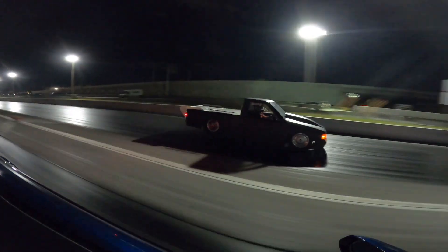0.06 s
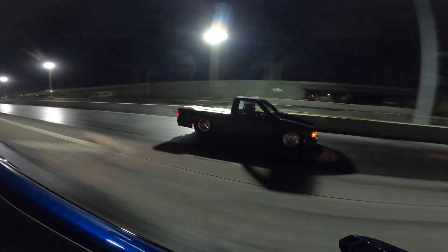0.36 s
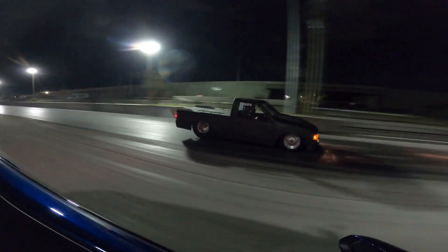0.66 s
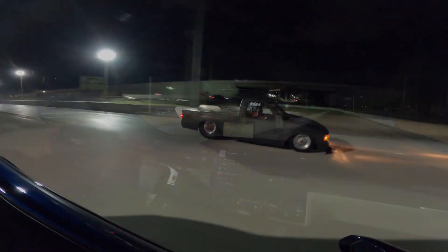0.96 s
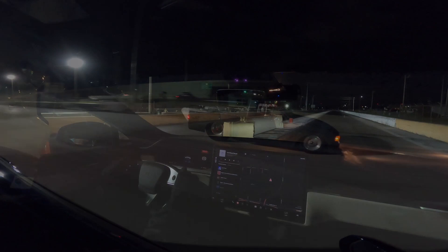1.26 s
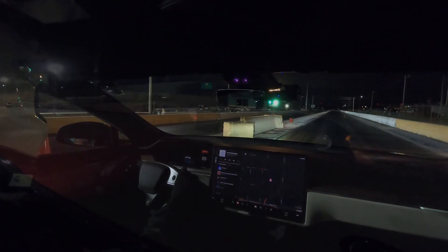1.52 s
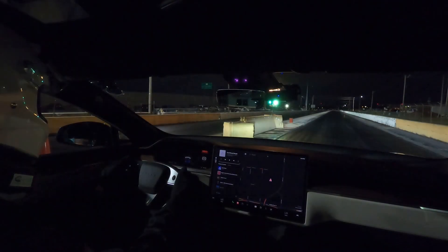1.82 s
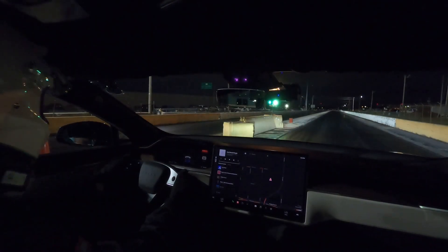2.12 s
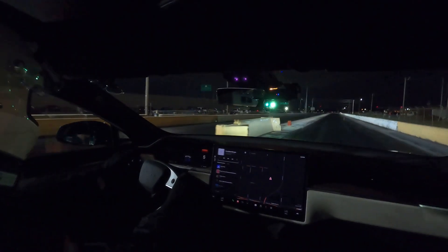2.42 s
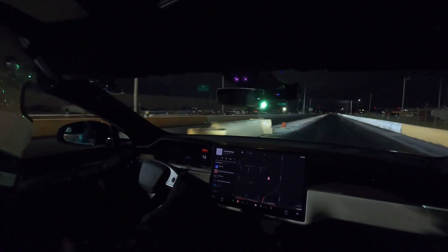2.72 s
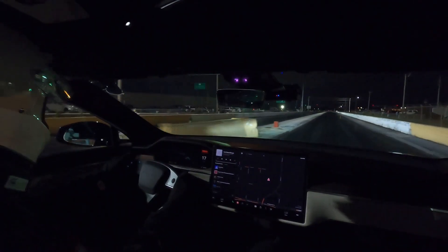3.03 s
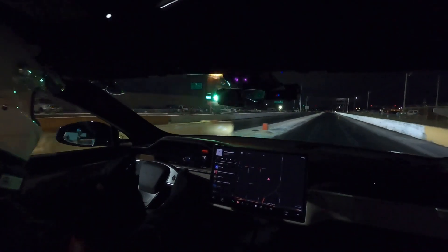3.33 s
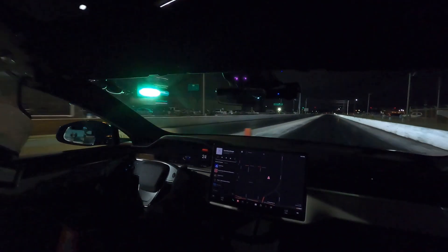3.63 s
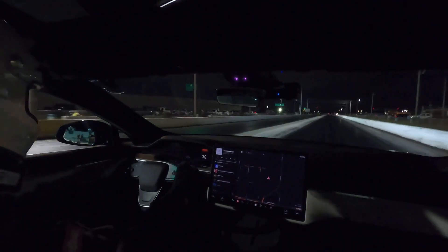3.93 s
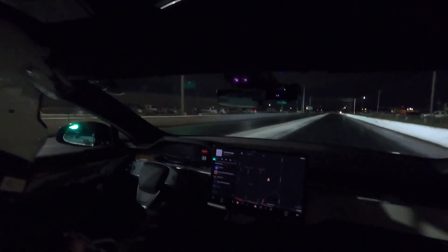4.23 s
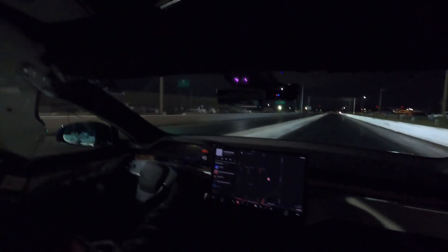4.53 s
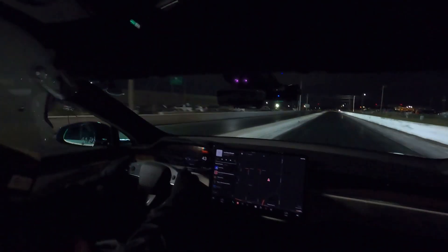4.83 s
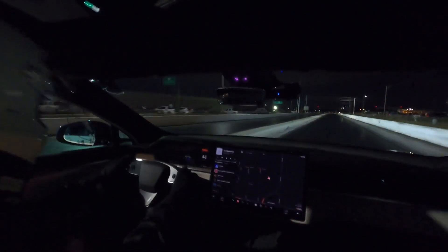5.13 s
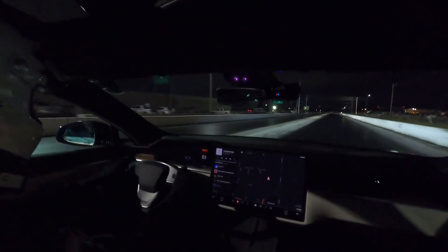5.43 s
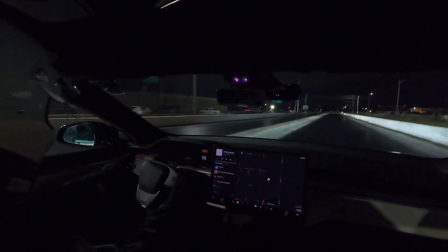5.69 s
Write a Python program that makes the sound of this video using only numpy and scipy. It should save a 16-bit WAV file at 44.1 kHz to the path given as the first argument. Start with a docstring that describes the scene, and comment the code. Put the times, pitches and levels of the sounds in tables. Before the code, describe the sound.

A V8 pickup roars flat out and shifts up, then a V8 revs high and holds, heard from inside a rumbling car.

```python
"""Night at a drag strip. First a V8 pickup runs flat out beside a car, its exhaust pulses roaring through
the rushing air, and shifts up. That fades into the closed cabin of a car rolling to the start, its floor
rumbling. In the next lane a V8 idles with an uneven beat, then revs up and is held at high revs: its low
notes boom through the car's body and its rasp leaks through the glass. Meanwhile the plastic trim ticks
and the car's drive whines faintly."""
import sys
import numpy as np
from scipy import signal
from scipy.fft import rfft, irfft, next_fast_len
from scipy.io import wavfile
from scipy.ndimage import uniform_filter1d

SR = 44100
rng = np.random.default_rng(int(sys.argv[2]) if len(sys.argv) > 2 else 0)


def waveform_to_disk(signal):
    """Save audio, clipped to [-1, 1], as 16-bit WAV at the path in sys.argv[1]."""
    frames = np.transpose(np.atleast_2d(signal))
    scaled = np.clip(frames, -1, 1) * 32767
    samples = np.round(scaled).astype(np.int16)
    wavfile.write(sys.argv[1], SR, samples)


N = 254016
TIME = np.arange(N) / SR


def from_db(db):
    """Turn decibels into a number to multiply by."""
    return 10 ** (np.asarray(db) / 20)


def rms_one(x):
    """Scale a sound so that its average strength (rms) is 1."""
    return x / np.sqrt(np.mean(x ** 2) + 1e-20)


def even(x):
    """Even out slow changes in loudness, keeping the single beats."""
    power = np.mean(np.atleast_2d(x) ** 2, axis=0)
    return x / np.sqrt(uniform_filter1d(power, size=5000) + 1e-6)


def curve(rows):
    """Join (time_s, value) points with straight lines."""
    return np.interp(TIME, *np.transpose(rows))


def fade_in(start_s, end_s):
    """A straight rise from 0 to 1."""
    return np.clip((TIME - start_s) / max(end_s - start_s, 1e-3), 0, 1)


def swell(middle_s, length_s):
    """A smooth rise from 0 to 1 and back."""
    return np.cos(np.pi * np.clip((TIME - middle_s) / length_s, -.5, .5)) ** 2


def drift(rate_hz):
    """Smooth random wavering, about 1 in size."""
    pole = np.exp(-80 * np.pi * rate_hz / SR)
    slow = signal.lfilter([1], [1, -2 * pole, pole * pole], rng.standard_normal(N // 40 + 2002))[2000:]
    return np.interp(np.arange(N) / 40, np.arange(len(slow)), rms_one(slow))


def stereo_noise(side_db, size=N):
    """White noise for left and right; the lower side_db, the more alike they are."""
    mid, side = rng.standard_normal((2, size))
    return mid + from_db(side_db) * side * np.array([[1], [-1]])


def colour(x, spectrum):
    """Shape a sound by (pitch_hz, level_db) points, cut steeply past their ends; strength 1."""
    hz, db = np.transpose(spectrum)
    size = next_fast_len(N + SR // 4)
    octave, points = np.log2(np.maximum(np.fft.rfftfreq(size, 1 / SR), 1)), np.log2(hz)
    beyond = np.abs(octave - np.clip(octave, points[0], points[-1]))
    gain = from_db(np.interp(octave, points, db) - 36 * beyond)
    return rms_one(irfft(rfft(x, size) * gain, size)[..., :N])


def tone(turns):
    """A pure tone of strength 1 that swings once per turn."""
    return np.sqrt(2) * np.sin(2 * np.pi * (turns + rng.random()))


def crank(speed, unsteady):
    """Count the engine cycles turned so far; the speed (cycles per second) trembles slightly."""
    return np.cumsum(speed * (1 + unsteady * drift(18))) / SR


# The eight cylinders, whose two banks fire unevenly: delay_in_firing_gaps, level_db
CYLINDERS = [(0.0013, 7.5), (0.25, -11), (.03, 5), (.16, 0.5), (.1, 1), (0.027, 9.5), (0.046, -4.5),
             (.14, 4)]


def firings(cycles, rough_db):
    """Eight exhaust pulses a cycle, each with its cylinder's strength and some chance."""
    number = np.arange(int(cycles[-1] * len(CYLINDERS)) - 1)
    delay, db = np.array(CYLINDERS)[number % len(CYLINDERS)].T
    at = np.interp((number + delay) / len(CYLINDERS), cycles, np.arange(N)).clip(0, N - 2)
    strength = from_db(db + rough_db * rng.standard_normal(4000)[:len(at)])
    whole, part = at.astype(int), at % 1   # each pulse is shared between two samples
    return np.bincount(whole, strength * (1 - part), N) + np.bincount(whole + 1, strength * part, N)


def puffs(pulses, decay_s, depth, side_db):
    """Swirling gas: noise that swells with each exhaust pulse."""
    pressure = even(signal.lfilter([1], [1, -np.exp(-1 / (decay_s * SR))], pulses + 1e-18))
    return rms_one(stereo_noise(side_db) * (1 + depth * pressure))


def scatter(pulses, ring_s, side_db):
    """Short echoes smear each pulse; as the vehicles move, three sets of them trade places."""
    age, out = TIME[:SR // 6], 0
    for _ in range(3):
        echoes = stereo_noise(side_db, size=len(age)) * from_db(-60 * age / ring_s)
        out = out + drift(1.8) * signal.oaconvolve(pulses[None], echoes, axes=1)[:, :N]
    return out


# Loud and quiet spots. An "order" is a tone at that many times the engine's cycle rate.
# middle_s, length_s, order, change_db
STANDING_WAVES = [(.15, .7, 14, 4), (.68, .55, 8, 4.5), (2.03, .2, 13, 5), (2.07, .15, 8, 3),
                  (2.17, .4, 7, -8), (2.3, .5, 11, 5), (2.45, .5, 16, 4), (2.5, .5, 20, -10),
                  (2.55, .6, 13, -5), (2.75, 1.4, 15, 5), (3.05, .4, 16, -7), (3.05, .3, 13, 5),
                  (3.25, .3, 21, 3), (3.25, .35, 41, 5), (3.3, .6, 11, 4), (3.35, .35, 15, -7),
                  (3.42, .45, 16, 5), (3.35, .4, 20, -3), (3.5, .9, 7, 4), (3.55, 1.0, 3, 2.5),
                  (3.55, 1.0, 5, 2.5), (3.75, .5, 9, 5), (3.8, .5, 16, -10), (3.85, 1.0, 2, 7),
                  (3.9, .3, 13, -8), (4.0, .4, 8, 2.5), (4.13, .4, 9, -8), (4.22, .7, 5, -6),
                  (4.25, .7, 3, -3), (4.4, .3, 17, -9), (4.42, .3, 11, -9), (4.5, .8, 4, 5),
                  (4.5, .5, 32, -8), (4.55, .6, 40, -6), (4.7, .3, 16, 6), (4.72, .5, 9, 4),
                  (5.2, .7, 7, -10), (5.3, .7, 3, -6), (5.7, .5, 5, -9), (5.7, .7, 4, 8),
                  (5.72, .35, 16, 10), (5.72, .35, 19, 10), (5.75, .3, 11, -9)]


def standing_db(order):
    """One order swells or sinks as the car rolls through standing waves between the vehicles."""
    return sum(db * swell(s, length) for s, length, which, db in STANDING_WAVES if which == order)


def overtones(cycles, speed, speeds, orders, wander_db, flutter, spread, entry=lambda order: 1):
    """Exhaust tones whose levels follow engine speed; spread puts left and right out of step."""
    out = 0
    for order, *db in orders:
        level_db = np.interp(speed, speeds, db) + standing_db(order) + wander_db * drift(1.9)
        angle = 2 * np.pi * (order * cycles + rng.random()) + flutter * drift(22)
        mid = np.sin(angle) * (1 + flutter * drift(8.3))
        side = spread * drift(0.86) * np.cos(angle)
        out = out + np.sqrt(2) * entry(order) * from_db(level_db) * np.array([mid + side, mid - side])
    return out


# The truck pulls, shifts up and settles: time_s, cycles_per_s
RUN_SPEED = [(0.0, 47.6), (.15, 47.7), (.35, 48.5), (.63, 49.6), (.845, 48.0), (.895, 40.8), (.95, 39.9),
             (1.15, 39.4), (1.6, 38.8)]
# The two tones that carry its note, at the two RUN_SPEEDS: order, slow_db, fast_db
DRONE_ORDERS = [(5, -20, -15), (8, -12.2, -26)]
# The tones in its roar, which the pipes favour differently at each speed: order, slow_db, fast_db
ROAR_ORDERS = [(3, -3, -13), (4, -1.5, -8), (7, -2.5, -12), (9, -7, -8), (11, -20, -13.5), (12, -23, -15),
               (14, -15, -12.5), (16, -10.5, -18), (17, -18, -15.5), (27, -40, -22), (29, -28, -16.5),
               (30, -27, -19), (37, -28, -21), (40, -37, -23)]
# The tone colour of the roar: pitch_hz, level_db
ROAR_COLOUR = [(380, 8), (470, 2.5), (680, 0), (810, -8.5), (1000, -6.5), (1150, -7.5), (1420, -5.5),
               (1600, -4), (1800, -7.5), (2100, -13.5), (2600, -46)]
# The tone colour of the rushing air: pitch_hz, level_db
AIR_COLOUR = [(1290, -28), (2200, 3.5), (5150, -5.5), (8020, -15), (9280, -11.5), (11500, -26),
              (15000, -41), (22000, -120)]
RUN_SPEEDS = (39.8, 47.5)   # cycles per second


def truck_at_speed():
    """An open exhaust across the lane, in rushing air; it stumbles and barks in the gear shift."""
    speed = curve(RUN_SPEED)
    shift = swell(middle_s=.85, length_s=.14)
    cycles = crank(speed, unsteady=0.00214 + .02 * shift)
    pulses = firings(cycles, rough_db=3)
    drone = overtones(cycles, speed, RUN_SPEEDS, DRONE_ORDERS, wander_db=.7, flutter=.07, spread=0)
    tones = overtones(cycles, speed, RUN_SPEEDS, ROAR_ORDERS, wander_db=.5, flutter=.062, spread=0)
    beats = even(colour(scatter(pulses, ring_s=0.013, side_db=-53), ROAR_COLOUR))
    gas = colour(puffs(pulses, decay_s=0.0014, depth=0.61, side_db=-70.5), ROAR_COLOUR)
    roar = from_db(-20.5) * (from_db(2.5) * tones + from_db(-10.5) * beats + from_db(3.5 * shift) * gas)
    air_gain = from_db(-32 + 1.3 * drift(9.3))
    air = air_gain * colour(puffs(pulses, decay_s=0.002, depth=0.37, side_db=-52), AIR_COLOUR)
    share = outside_share()
    return share ** 0.88 * drone + share * (roar + air)   # the drone lingers a little


# The tone colour of the buffeting: pitch_hz, level_db
BUFFETING_COLOUR = [(20, -18), (35, -13), (55, -2), (110, -5), (190, -4.5), (290, -6), (380, -27.5),
                    (500, -24), (800, -17)]


def buffeting():
    """Deep buffeting, with a low rumble that lingers as the cabin fades in."""
    rumble = from_db(-14.5) * even(colour(stereo_noise(side_db=-71), BUFFETING_COLOUR))
    return outside_share() ** 0.68 * rumble


def outside_share():
    """Falls from 1 to 0 as the open air gives way to the cabin."""
    return (1 - fade_in(start_s=0.69, end_s=1.694)) ** 1.26


# Swells of low rumble: middle_s, length_s, level_db
RUMBLE_SWELLS = [(1.384, 0.73, -13.5), (2.214, 0.28, -18), (3.78, 0.43, -21), (4.036, 0.34, -24),
                 (4.375, 0.51, -16), (4.844, 0.23, -25.5), (5.111, 0.37, -17), (5.458, 0.15, -17.5),
                 (5.725, 0.22, -24)]
# The tone colour of the floor's rumble: pitch_hz, level_db
FLOOR_COLOUR = [(10, -17), (21, 6), (27, -3), (38, -2), (55, -14.5), (90, -21.5)]
# The tone colour of the tyres: pitch_hz, level_db
TYRE_COLOUR = [(40, -12.5), (70, -5.5), (130, -8.5), (300, -10), (450, -16.5), (750, -25), (1100, -36)]


def rolling():
    """The floor rumbles, in swells and more as the car gathers speed; the tyres give a dull rush."""
    steady = from_db(-27 + 2.7 * (TIME - TIME.mean()))
    swells = sum(from_db(db) * swell(s, length) for s, length, db in RUMBLE_SWELLS)
    rumble = (steady + swells) * even(colour(stereo_noise(side_db=-31.5), FLOOR_COLOUR))
    tyres = from_db(-27 + 0.84 * drift(4.9)) * colour(stereo_noise(side_db=-27), TYRE_COLOUR)
    return rumble + tyres


def rev_gain(idle_db, open_db, held_db, delay_s):
    """Loudness at idle, rising as the throttle opens, then settling once the engine runs clean."""
    open_s, clean_s = 1.78 + delay_s, 1.96 + delay_s
    opened = fade_in(open_s, open_s + .09)
    settled = fade_in(clean_s, clean_s + .3)
    return from_db(idle_db + (open_db - idle_db) * opened + (held_db - open_db) * settled)


# The tone colour of the thuds heard through the car's body: pitch_hz, level_db
THUD_COLOUR = [(35, -20.5), (62, -1.5), (85, 4), (118, -5.5), (140, -4), (170, 4), (215, -10), (260, -12),
               (400, -35)]


def idle_thuds(ragged):
    """At low speed the cylinders burn unevenly, so the exhaust thuds and burbles."""
    burble = colour(puffs(ragged, decay_s=0.011, depth=0.86, side_db=-27), THUD_COLOUR)
    return rev_gain(-16.5, -12.5, -29.5, delay_s=-0.0086) * even(colour(ragged, THUD_COLOUR) + burble)


# The tone colour of the rasp: pitch_hz, level_db
RASP_COLOUR = [(720, -13), (850, -6.5), (1000, -11), (1130, -11), (1300, -4), (1490, -1), (1680, -9.5),
               (1880, -9.5), (2300, -18.5), (3000, -22), (5000, -32)]
# The tone colour of the hiss: pitch_hz, level_db
HISS_COLOUR = [(2000, -11.5), (2800, -4), (3600, -10), (4400, -9), (5800, -10), (7000, -17), (9000, -25.5),
               (11500, -35), (15000, -54)]


def exhaust_rasp(pulses, surge_db):
    """Smeared pulses and puffs of gas leak through the glass as a rasp with a hiss on top."""
    beats = even(colour(scatter(pulses, ring_s=0.079, side_db=-11.5), RASP_COLOUR))
    gas = colour(puffs(pulses, decay_s=0.0062, depth=0.68, side_db=-15.5), RASP_COLOUR)
    hiss = colour(puffs(pulses, decay_s=0.0023, depth=0.36, side_db=-1.5), HISS_COLOUR)
    rasp_gain = rev_gain(-47, -36, -38.5, delay_s=-0.0069) * from_db(surge_db)
    hiss_gain = rev_gain(-56.5, -49.5, -52, delay_s=0) * from_db(0.41 * surge_db)
    return rasp_gain * (beats + from_db(-7.5) * gas) + hiss_gain * hiss


# The cabin's own hollow notes, played 1% below the listed pitch: middle_s, length_s, pitch_hz, level_db
CABIN_BOOMS = [(1.68, .15, 168, -16), (1.77, .15, 116, -17), (1.84, .2, 170, -21), (1.88, .22, 93, -15)]


def cabin_booms():
    """As the engine picks up, its beats set the cabin ringing in short booms."""
    return sum(from_db(db) * swell(s, length) * tone(0.99 * hz * TIME)
               for s, length, hz, db in CABIN_BOOMS)


# The tone colour of the throttle's bark: pitch_hz, level_db
BARK_COLOUR = [(290, 11), (390, 6), (470, -6.5), (570, 0), (700, -6.5), (780, 1), (850, -9.5), (950, -16)]


def throttle_bark(ragged, surge_db):
    """Ragged puffs of gas bark out as the throttle opens."""
    bark = even(colour(puffs(ragged, decay_s=0.004, depth=0.7, side_db=-13.5), BARK_COLOUR))
    return rev_gain(-37, -19.5, -40, delay_s=.022) * from_db(surge_db) * bark


def tone_entry(order):
    """Clean tones rise out of the burble, the low ones first and the high ones last."""
    start_s = 1.83 + .011 * order
    return fade_in(start_s, start_s + .11)


# The low tones that boom through the car's body: order, level_db
BOOM_ORDERS = [(3, -1.8), (5, 0.15), (7, -10.5), (8, 0.55), (9, -14.5)]
# How strongly the cabin carries each pitch: pitch_hz, level_db
CABIN_RESPONSE = [(60, -28), (88, -23.5), (105, -25.5), (115, -21), (127, -36), (137, -14), (180, -13),
                  (190, -18.5), (199, -15.5), (208, -27.5), (245, -16.5), (266, -17.5), (286, -17),
                  (298, -20.5), (304, -14.5), (308.5, -29), (317, -21), (334, -13), (345, -13.6),
                  (360, -10.5), (380, -19)]


def body_boom(cycles, speed):
    """Each low tone swells and sinks as it crosses pitches the cabin favours or swallows."""
    hz, response_db = np.transpose(CABIN_RESPONSE)
    out = 0
    for order, db in BOOM_ORDERS:
        level_db = db + np.interp(order * speed, hz, response_db) + standing_db(order) + .5 * drift(5)
        out = out + tone_entry(order) * from_db(level_db) * tone(order * cycles)
    return out * (1 + .05 * drift(12))


# The tones of the held engine, at the three HELD_SPEEDS: order, slow_db, medium_db, fast_db
HELD_ORDERS = [(2, -8.5, -4, -3.5), (4, -13, -8.5, -4.5), (6, -17, -12, -10), (10, -10, -14, -10),
               (11, -1.5, -11, 1.5), (12, -15, -7.5, -17.5), (13, -5, -11.5, -18.5), (14, -14, -9, -12),
               (15, -8, -10.5, -13.5), (16, -4.5, -12, -18), (17, -21.5, -12, -12), (19, -16, -15, -28),
               (20, -16, -11, -22), (21, -18.5, -10.5, -15), (22, -14, -20, -19.5), (24, -19, -17, -27),
               (32, -30, -18.5, -28), (36, -30, -19.5, -28), (40, -25, -15, -37), (41, -16.5, -21, -36),
               (50, -34, -24, -34)]
HELD_SPEEDS = (35.9, 38.0, 42.84)   # cycles per second


def held_note(cycles, speed, note_db, rasp_db):
    """Under throttle the pulses merge into tones, which roughen whenever the exhaust swells."""
    flutter = .11 + .025 * np.maximum(note_db + rasp_db, 0)
    tones = overtones(cycles, speed, HELD_SPEEDS, HELD_ORDERS,
                      wander_db=1.4, flutter=flutter, spread=.2, entry=tone_entry)
    return from_db(-27.5 + note_db) * tones


# The engine revs up from idle: time_s, cycles_per_s
REV_UP = [(1.4, 14.0), (1.72, 14.5), (1.8, 15.8), (1.88, 19.3), (1.93, 23.2), (1.98, 27)]
# It is held high and raised in two steps: time_s, cycles_per_s
HIGH_REVS = [(2.03, 29.7), (2.07, 31.5), (2.19, 34.1), (2.33, 35.3), (2.71, 36.1), (3.07, 35.9),
             (3.19, 37.1), (3.47, 38.7), (3.67, 38.1), (4.49, 38.1), (4.74, 39.6), (4.88, 41.7),
             (4.95, 41.9), (5.38, 42.4), (5.5, 42.4), (5.74, 40.9)]
# The exhaust swells or sinks for a moment: middle_s, length_s, note_db, rasp_db
SURGES = [(3.332, 0.71, 2, 5.5), (3.836, 0.81, -4, 0), (4.067, 0.41, 3.5, 3.5), (4.34, 0.94, 1, 4),
          (4.866, 0.78, 3.5, 1.5), (5.75, 0.36, 3, 1.5)]
# How much louder the truck is on the left: time_s, left_minus_right_db
BALANCE = [(1.6, 0.4), (2.2, 0.5), (3.2, 0.5), (3.7, -0.5), (4.2, 0), (4.7, 1.6), (5.76, 1.5)]


def truck_from_cabin():
    """The V8 in the next lane, heard from inside; it is on the left, so that ear hears it sooner."""
    speed = curve([*REV_UP, *HIGH_REVS])
    note_db, rasp_db = sum(np.outer(db, swell(s, length)) for s, length, *db in SURGES)
    cycles = crank(speed, unsteady=0.0013)
    ragged, pulses = firings(cycles, rough_db=1.6), firings(cycles, rough_db=1.2)
    exhaust = idle_thuds(ragged) + exhaust_rasp(pulses, rasp_db)
    revving = cabin_booms() + throttle_bark(ragged, rasp_db)
    held = body_boom(cycles, speed) + held_note(cycles, speed, note_db, rasp_db)
    left, right = exhaust + revving + held
    right = np.interp(TIME - .00008, TIME, right)
    lean = from_db(curve(BALANCE) / 2)
    return np.array([left * lean, right / lean])


# Ticks of the trim, each falling 60 dB in ring_s: start_s, knock_db, clack_db, grit_db, ring_s
TICKS = [(2.107, -26, -38, -61, .042), (2.204, -39, -52, -54, .06), (2.247, -36, -40, -49, .08),
         (2.268, -46, -50, -53, .09), (2.961, -32, -41, -57, .05), (3.708, -31.5, -39, -55, .07),
         (3.793, -39, -52, -55, .04), (4.028, -34, -48, -49, .1), (5.165, -40, -47, -47, .06)]


def trim_ticks():
    """Plastic trim slips: a hollow knock, a clack and a gritty bright edge die away together."""
    levels = np.zeros((3, N))
    for start_s, *db, ring_s in TICKS:
        decay = from_db(-60 * np.clip((TIME - start_s) / ring_s, 0, 3))
        levels += np.outer(from_db(db), fade_in(start_s, start_s + .0013) * decay)
    knock = colour(stereo_noise(side_db=-12.5), [(700, 0), (1500, 0), (2400, -5)])
    clack = colour(stereo_noise(side_db=-12.5), [(2400, -2), (3500, 0), (4500, -12)])
    crackle = stereo_noise(side_db=-12) * from_db(3 * drift(250))
    grit = colour(crackle, [(4000, 4), (7300, 3), (9500, -4), (13000, -22)])
    return levels[0] * knock + levels[1] * clack + levels[2] * grit


# Whines of the car's drive: middle_s, length_s, pitch_hz, glide_hz_per_s, wobble_hz, level_db
WHINES = [(2.4, .55, 5350, 0, 300, -64), (3.7, .3, 5400, 0, 110, -65), (5.35, .5, 7150, 950, 25, -73)]


def drive_whines():
    """Thin, high whines from the drive; an unsteady pitch turns them into a sizzle."""
    out = 0
    for s, length, hz, glide, wobble_hz, db in WHINES:
        pitch_hz = hz + glide * np.clip(TIME - s, -length, length) + wobble_hz * drift(200)
        out = out + from_db(db) * swell(s, length) * tone(np.cumsum(pitch_hz) / SR)
    return out


def scene():
    """The open air comes first; the cabin fades in as it fades out."""
    outside = truck_at_speed() + buffeting()
    cabin = rolling() + truck_from_cabin() + trim_ticks() + drive_whines()
    return outside + (1 - outside_share()) ** 3.9 * cabin


def record(dry):
    """Round off the tallest peaks and cut the very highest treble."""
    ceiling, cutoff_hz = .85, 15800
    rounded = dry / (1 + (dry / ceiling) ** 8) ** (1 / 8)
    return signal.sosfilt(signal.cheby2(12, 70, cutoff_hz, fs=SR, output="sos"), rounded)


dry = scene()
out = record(dry)
waveform_to_disk(out)
```